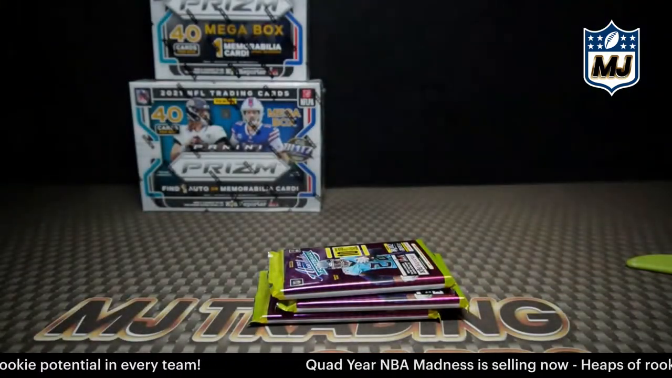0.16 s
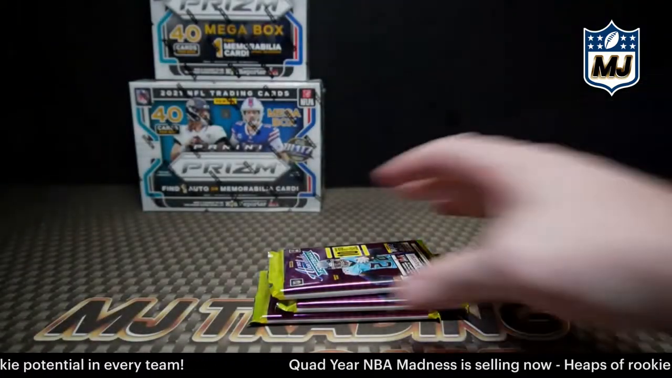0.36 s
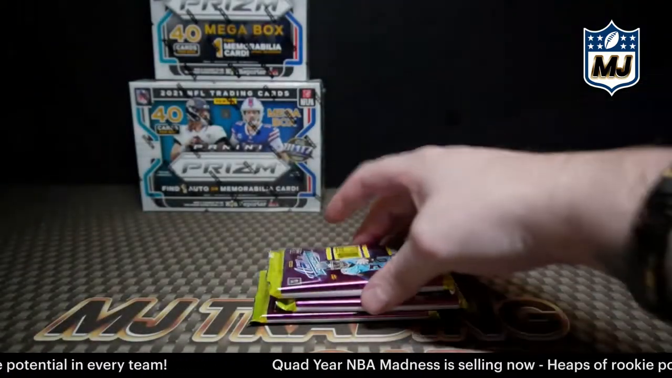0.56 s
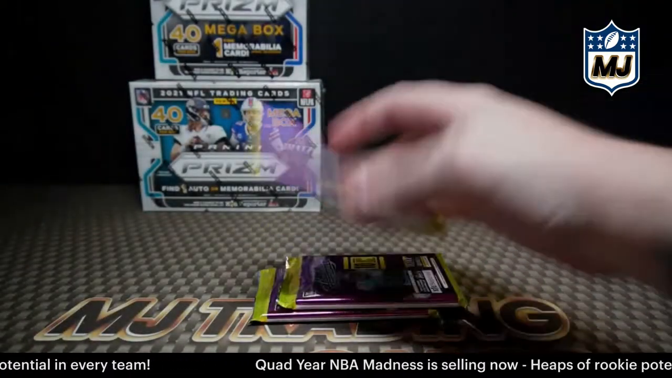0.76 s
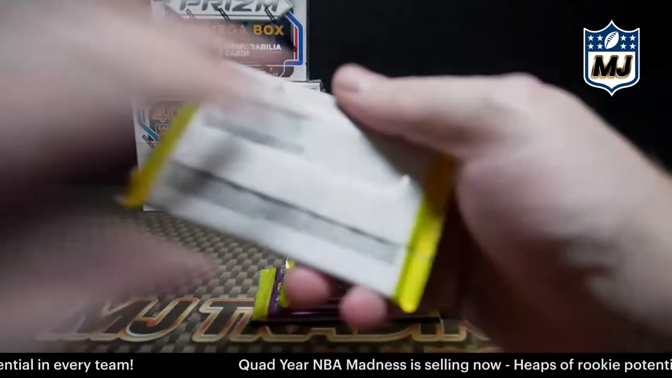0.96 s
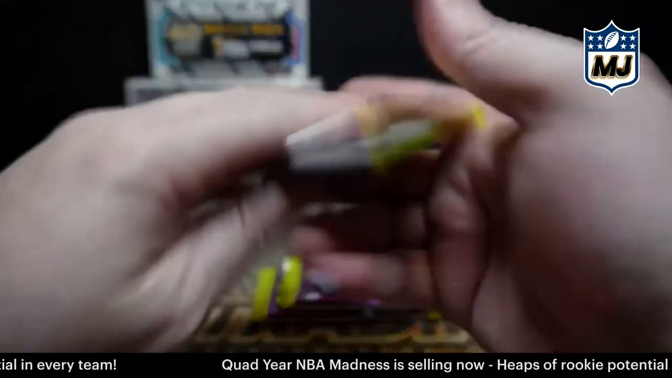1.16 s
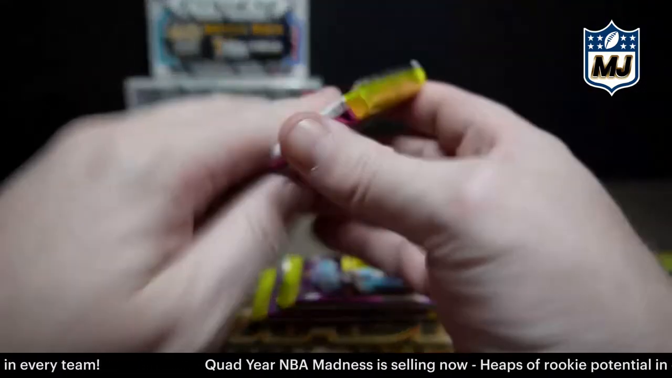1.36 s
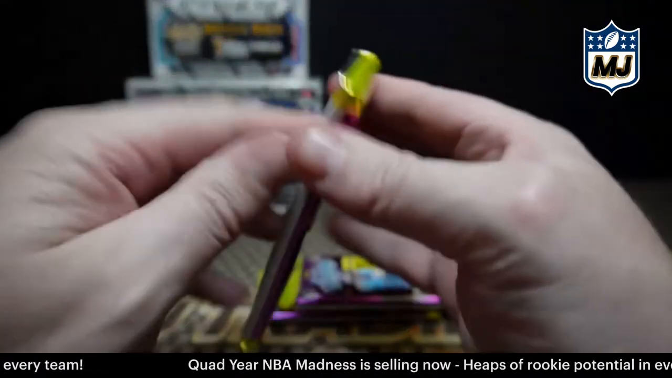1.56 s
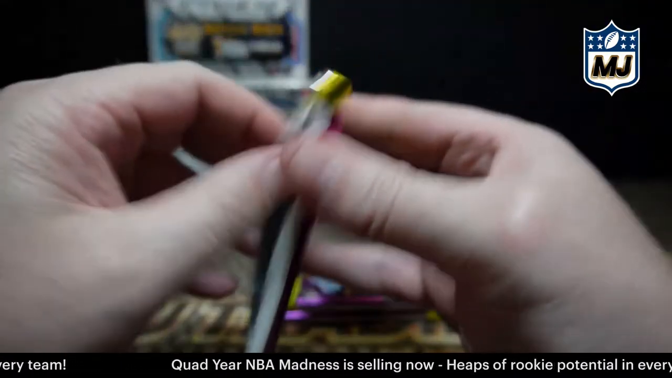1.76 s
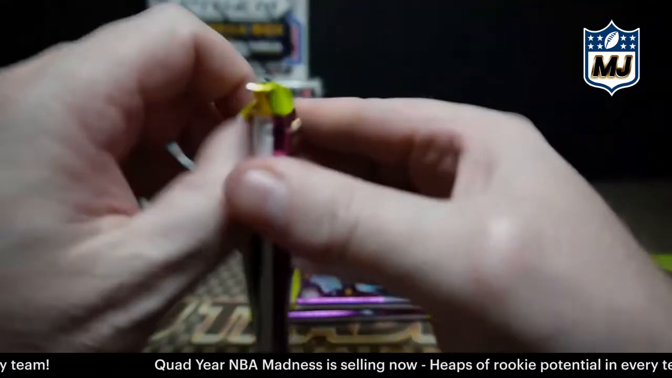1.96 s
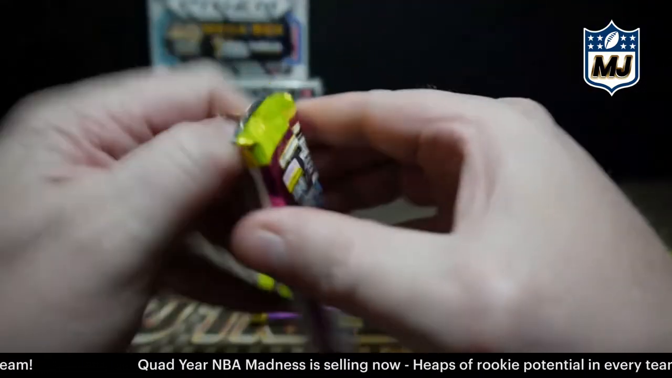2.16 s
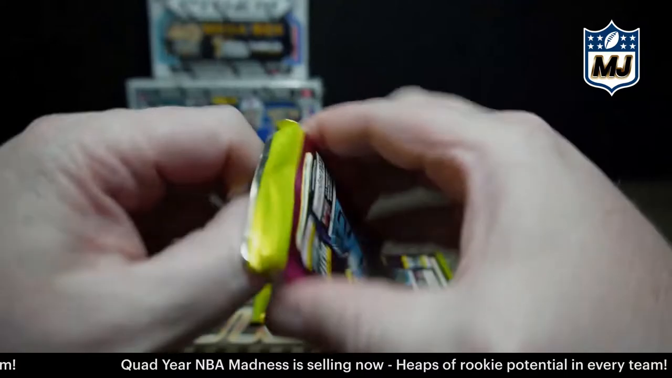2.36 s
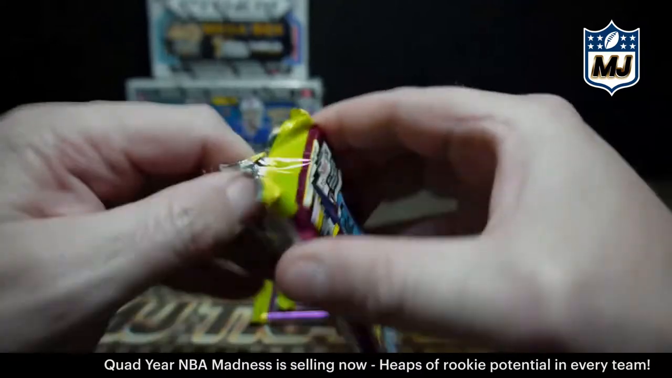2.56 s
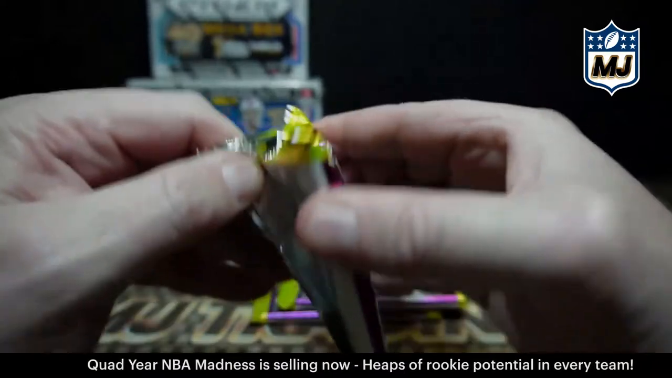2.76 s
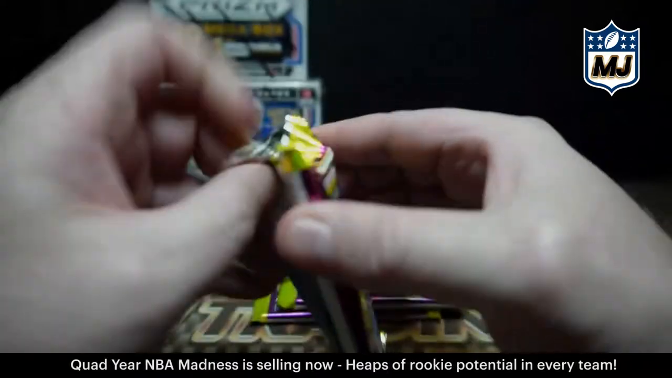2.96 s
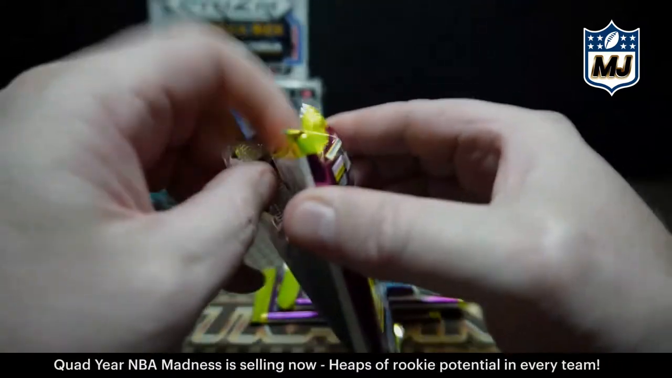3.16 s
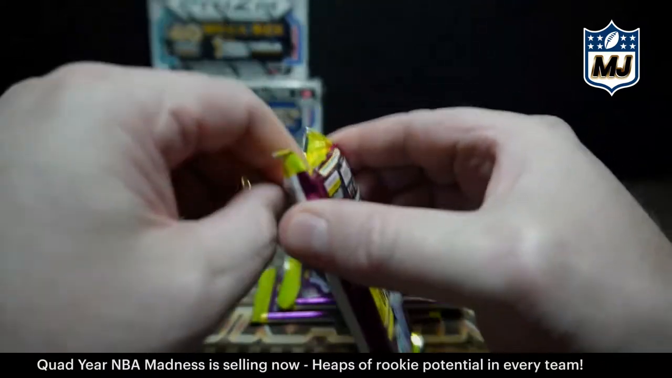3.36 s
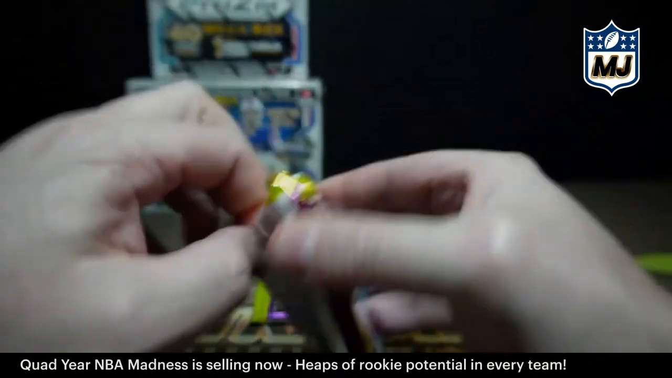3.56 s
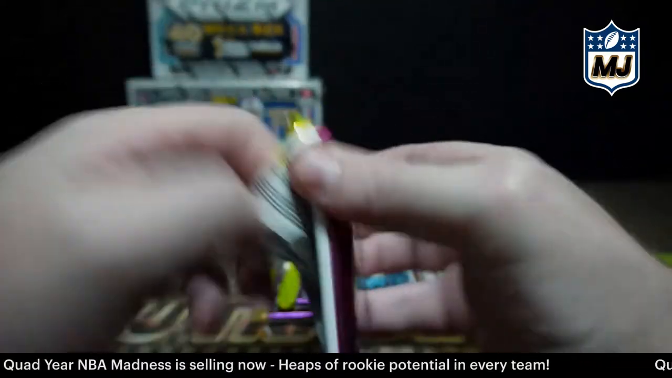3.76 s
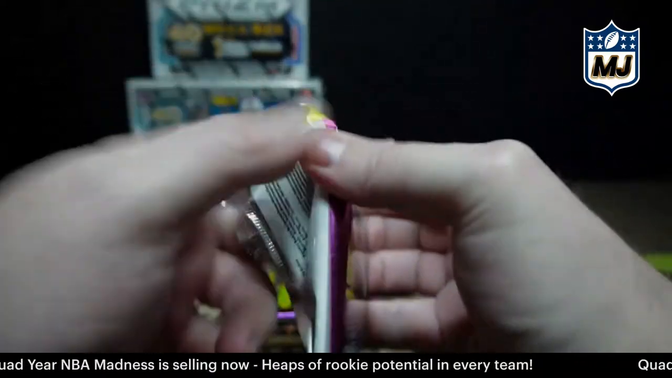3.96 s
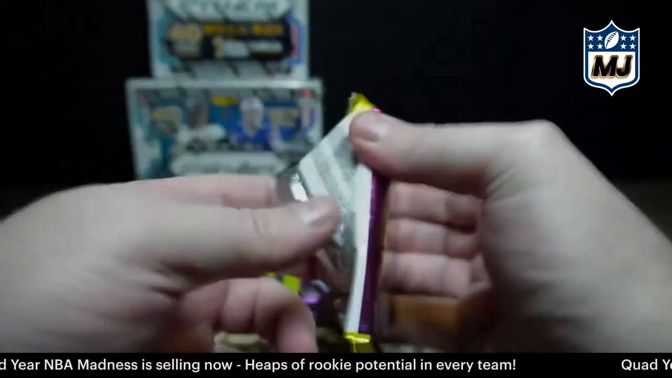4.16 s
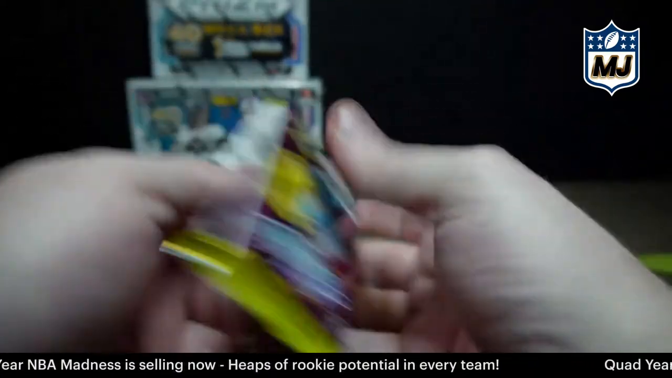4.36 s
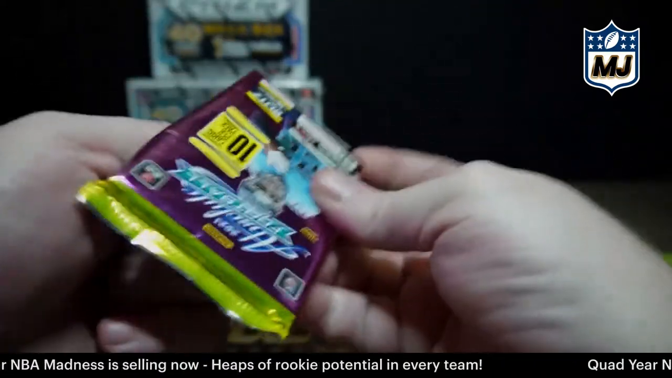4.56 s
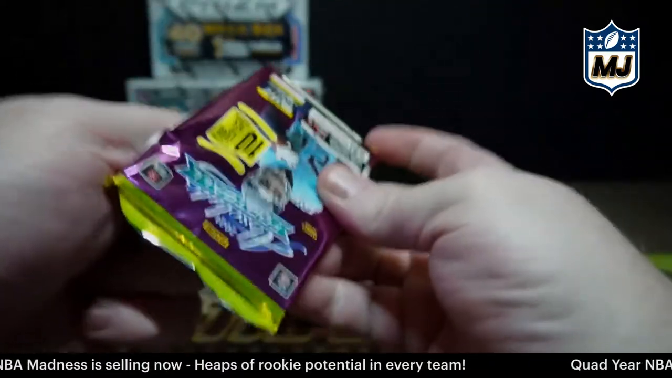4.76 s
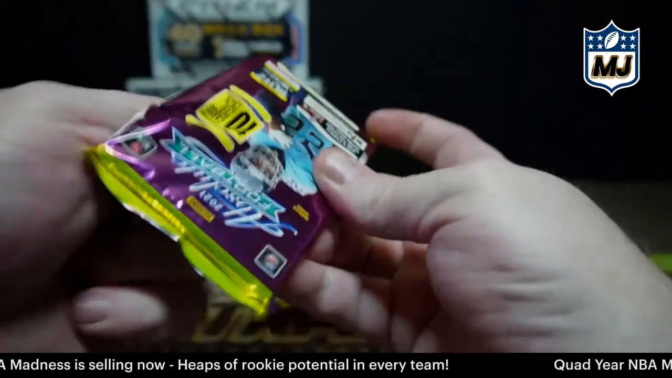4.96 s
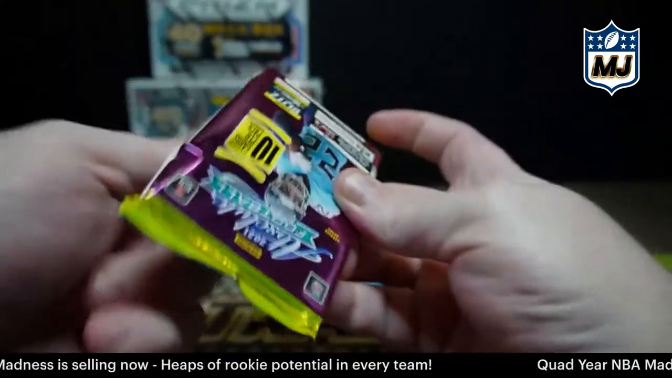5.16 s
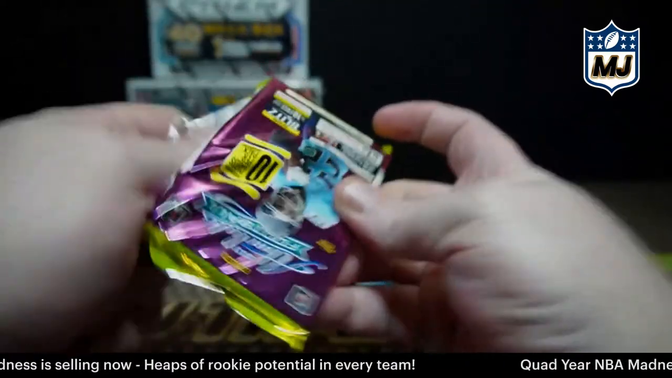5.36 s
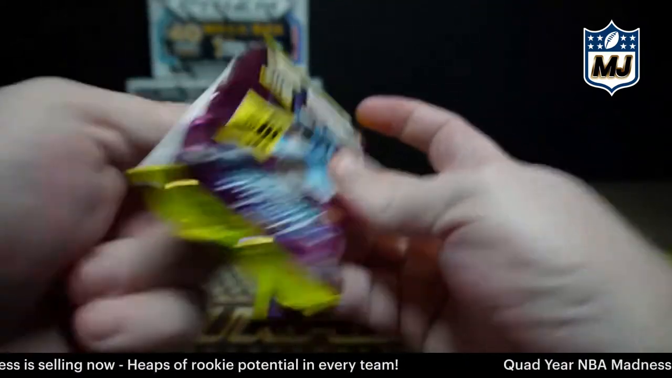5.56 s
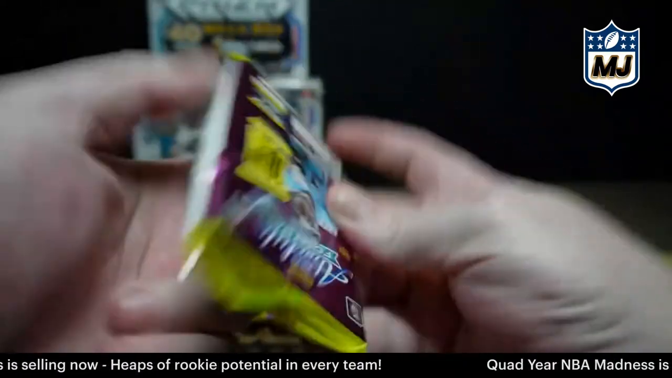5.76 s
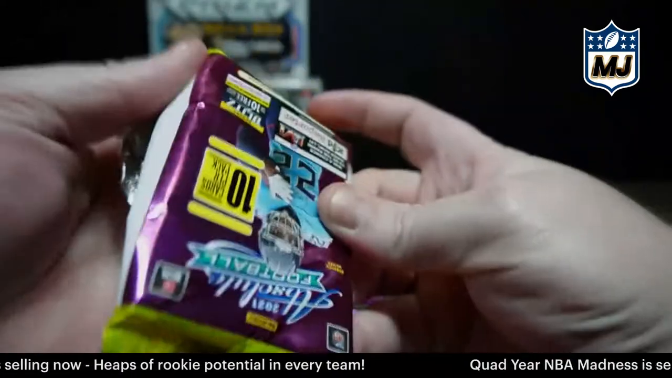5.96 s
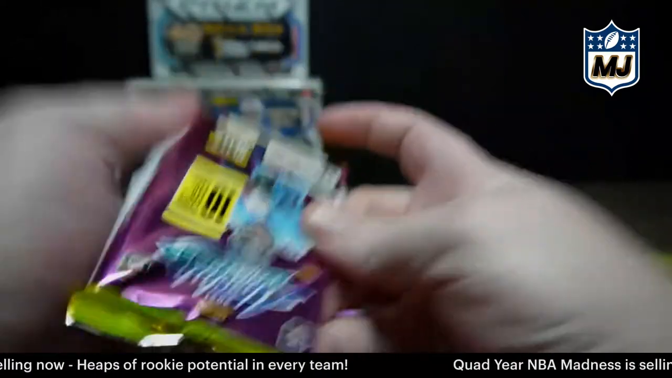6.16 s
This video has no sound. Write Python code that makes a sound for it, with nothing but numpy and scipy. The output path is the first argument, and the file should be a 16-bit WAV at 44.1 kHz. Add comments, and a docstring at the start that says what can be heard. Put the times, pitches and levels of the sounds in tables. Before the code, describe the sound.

Hands tear open a foil card pack close up, the thin wrapper crackling and snapping almost continuously in a quiet room.

```python
"""A quiet room, close up: two hands pick up a foil packet, pull its seam apart and crumple it.
Creases buckle as sharp snaps over a bed of fine crackle; large folds pop hollow; the seal peels in
fast slips. The grip shapes the foil's lows, ring and treble. Underneath: soft handling thuds and
scuffs, low table or room resonance, a faint hum and room tone.
A noise suppressor lowers the quiet moments; a limiter holds the peaks."""
import sys
import numpy as np
from scipy import signal
from scipy.io import wavfile
from scipy.ndimage import uniform_filter1d, minimum_filter1d

SR = 44100
rng = np.random.default_rng(int(sys.argv[2]) if len(sys.argv) > 2 else 0)


def to_wav(sig):
    """Store sig (one row per channel, or 1-D mono) as 16-bit WAV at the path in sys.argv[1].

    Samples outside -1..1 are clipped; the rate is SR.
    """
    pcm = np.clip(np.atleast_2d(sig), -1, 1) * 32767
    pcm = np.round(pcm).astype(np.int16)
    wavfile.write(sys.argv[1], SR, pcm.T)  # frames by channels


N = 277422

# loudest buckling creases: start_s, level_db
CREASE_SNAPS = [(0.7984, -20.9), (0.8163, -20.2), (0.8612, -25.4), (1.1325, -19.7), (1.1999, -17.1),
                (1.2869, -9.7), (1.3296, -14.0), (1.3357, -8.8), (1.3837, -17.3), (1.4237, -11.0),
                (1.4824, -18.1), (1.6925, -18.4), (1.7093, -10.8), (1.8949, -26.0), (1.9319, -19.2),
                (1.9981, -10.4), (2.0047, -10.7), (2.1351, -9.3), (2.2573, -9.9), (2.2674, -9.4),
                (2.3114, -10.5), (2.3371, -12.0), (2.3938, -10.0), (2.4364, -9.1), (2.4466, -8.9),
                (2.4853, -9.3), (2.5251, -11.6), (2.5766, -7.6), (2.6166, -10.6), (2.6606, -14.9),
                (2.6661, -9.6), (2.6825, -11.2), (2.7079, -10.9), (2.7536, -10.5), (2.7693, -8.4),
                (2.8236, -8.2), (2.8508, -10.9), (2.9243, -7.6), (3.001, -12.5), (3.0122, -12.7),
                (3.037, -12.2), (3.1739, -12.1), (3.196, -8.4), (3.2513, -13.1), (3.3082, -13.3),
                (3.3289, -9.0), (3.4265, -9.7), (3.4315, -11.3), (3.4471, -12.1), (3.4621, -15.0),
                (3.5231, -14.6), (3.5376, -15.2), (3.5737, -16.2), (3.6088, -12.9), (3.6173, -7.2),
                (3.6439, -6.8), (3.7174, -12.6), (3.729, -10.5), (3.735, -13.0), (3.7562, -11.7),
                (3.7714, -8.2), (3.7917, -7.2), (3.9127, -6.8), (4.0017, -8.1), (4.0843, -12.3),
                (4.1276, -6.6), (4.1528, -9.1), (4.1589, -9.6), (4.2407, -8.6), (4.2737, -6.7),
                (4.3481, -8.9), (4.39, -7.8), (4.4019, -7.2), (4.455, -12.1), (4.4653, -7.7), (4.481, -8.3),
                (4.4973, -8.2), (4.5075, -8.6), (4.5547, -8.2), (4.6104, -18.3), (4.6177, -15.7),
                (4.6302, -12.1), (4.6469, -12.8), (4.6566, -6.8), (4.6836, -8.2), (4.7051, -5.6),
                (4.7482, -7.5), (4.7564, -7.4), (4.7705, -6.4), (4.7881, -9.2), (4.8432, -9.3),
                (4.8564, -6.8), (4.8683, -10.2), (4.8799, -7.8), (4.9367, -18.7), (4.9685, -7.5),
                (4.986, -7.6), (4.9988, -8.4), (5.0465, -11.7), (5.1072, -11.4), (5.2017, -12.8),
                (5.2505, -9.8), (5.2755, -5.4), (5.3246, -5.6), (5.3373, -10.0), (5.3813, -13.1),
                (5.429, -10.7), (5.4795, -7.7), (5.5546, -7.9), (5.6075, -9.8), (5.6487, -10.8),
                (5.7139, -10.1), (5.7235, -11.7), (5.7667, -7.7), (5.8173, -8.3), (5.8406, -7.4),
                (5.8461, -10.3), (5.8628, -8.5), (5.9103, -9.7), (5.9411, -10.8), (6.0698, -13.3),
                (6.1182, -8.0), (6.2565, -8.8)]
# thin foil spectrum: freq_hz, density_db
FOIL_SPECTRUM = [(240, -43.5), (400, -22), (563, -22.5), (986, -14.5), (1460, -11), (3030, -3), (6000, 2),
                 (7820, -4.5), (14600, -4), (15700, -11.5)]
# large folds: start_s, level_db, pitch_hz
FOLD_POPS = [(2.769, -29.5, 1060), (2.923, -21, 1320), (3.437, -32, 1140), (4.39, -15.5, 1070),
             (5.274, -19.5, 1070), (5.478, -20, 1080), (5.554, -16.5, 1040), (5.589, -20, 1180)]
# glued seal letting go: time_s, level_db, slips_per_s
SEAL_PEEL = [(2.147, -31.5, 445), (2.169, -24, 420), (2.191, -39.5, 440), (2.202, -27.5, 940),
             (2.244, -43, 1300)]
# hold on the packet: time_s, slack_db, ring_hz, treble_db
GRIP_CURVE = [(.6, 5, 2340, -11), (.9, 10.5, 3000, -43), (1.1, -25, 4640, 3.5), (1.38, 7, 2760, -22),
              (1.62, -5.5, 3580, -1), (2.05, 0, 3980, -1.5), (2.2, -4, 3330, -6.5), (2.4, 6.5, 3600, 3),
              (2.9, 6.5, 3090, -1), (3.4, 10, 3950, -6), (3.66, -1, 4330, 0.5), (3.9, 3, 3340, -3),
              (4.801, 0, 2280, -6), (5.18, -15, 2530, -18), (5.27, -4, 2740, -10), (5.5, 2.5, 2890, -0.2),
              (6.1, -1, 2310, -6.3), (6.29, 7, 2850, -14)]
# finger squeezes and pulls: full_force_s, hold_s, level_db
FINGER_SQUEEZES = [(0.507, 0.032, -81.5), (0.583, 0.014, -69), (0.813, 0.021, -54), (1.05, 0.027, -69),
                   (1.178, .01, -45), (1.265, 0.22, -46), (1.694, 0.033, -40), (2.041, 0.014, -30),
                   (2.157, 0.11, -38.5), (2.375, 0.12, -36), (2.695, 0.13, -38.5), (2.88, 0.056, -35.5),
                   (2.996, 0.057, -48.5), (3.188, 0.0077, -33), (3.322, 0.012, -40.5), (3.427, 0.011, -34),
                   (3.62, 0.038, -47.5), (3.79, 0.076, -34), (3.84, 0.038, -25.5), (3.928, 0.12, -34),
                   (4.134, 0.074, -38), (4.27, 0.014, -35.5), (4.361, 0.04, -33), (4.443, 0.15, -37.5),
                   (4.646, 0.13, -35.5), (4.767, 0.14, -35), (4.992, 0.085, -32), (5.118, 0.0052, -30.5),
                   (5.229, 0.12, -33), (5.294, 0.026, -30.5), (5.368, 0.15, -38), (5.575, 0.079, -34),
                   (5.764, 0.049, -33), (5.852, 0.026, -34), (5.94, 0.076, -28.5), (6.138, 0.048, -28),
                   (6.257, 0.044, -30.5)]
# crackle floor of the held foil: time_s, level_db
CRACKLE_FLOOR = [(.98, -81), (1.07, -63.5), (2.0, -59), (2.3, -42), (3.0, -48), (3.1, -58.5), (3.4, -55),
                 (3.55, -46.5), (6.29, -50.5)]
# thuds, scuffs, table or room resonance, faint hum: start_s, length_s, level_db, centre_hz, width_hz
LOW_THUDS_AND_RESONANCES = [(0.135, 0.084, -74.5, 2350, 600), (0.491, 0.077, -67, 279, 130),
                            (0.498, .055, -73, 1195, 90), (0.564, 0.11, -65, 150, 130),
                            (1.339, 0.056, -53, 171, 300), (1.394, 0.12, -62, 280, 130),
                            (1.71, 0.35, -68, 757, 110), (2.394, 0.3, -62.5, 353, 90),
                            (3.16, 0.12, -59, 305, 90), (3.299, 0.075, -57.5, 362, 70),
                            (3.837, 0.1, -50, 308, 197), (4.13, 0.2, -55.5, 322, 80),
                            (4.343, 0.12, -56, 293, 80), (4.626, 0.16, -58, 332, 75),
                            (5.47, 0.22, -62.5, 305, 60), (5.979, 0.072, -57.5, 216, 200)]
# room tone spectrum: freq_hz, density_db
ROOM_TONE_SPECTRUM = [(18, -94), (30, -49), (131, -15.5), (239, -18.5), (384, -18.5), (600, -36),
                      (988, -27), (16000, -58)]


def gain_of(db):
    return 10 ** (np.asarray(db) / 20)


def unit_rms(x):
    return x / np.sqrt(np.mean(x ** 2) + 1e-20)


def add(mix, start_s, sound):
    part = mix[round(start_s * SR):][:len(sound)]
    part += sound[:len(part)]


def butter(x, order, cutoff_hz, kind):
    return signal.sosfilt(signal.butter(order, cutoff_hz, kind, fs=SR, output="sos"), x)


def colour(x, spectrum):
    """Minimum-phase filter of unit energy from a spectrum table."""
    freq_hz, density_db = np.transpose(spectrum)
    bin_hz = abs(np.fft.fftfreq(4096, 1 / SR))
    log_gain = np.interp(np.log(bin_hz + 1), np.log(freq_hz + 1), density_db) * np.log(10) / 20
    taps = np.fft.ifft(np.exp(log_gain - 1j * signal.hilbert(log_gain).imag)).real[:2048]
    return signal.oaconvolve(x, taps / np.linalg.norm(taps))[:len(x)]


def resonate(x, centre_hz, width_hz):
    """Resonance at a steady or moving pitch; white noise keeps its level."""
    carrier = np.exp(2j * np.pi * np.cumsum(centre_hz * np.ones(len(x))) / SR)
    pole = np.exp(-np.pi * width_hz / SR)
    return np.sqrt(2 * (1 - pole * pole)) * (carrier * signal.lfilter([1], [1, -pole], x / carrier)).real


def crease_snaps(force_db, buckle_s=0.001, rise_s=0.000069, ring_db=-3, spread_oct=2.19, small_count=80):
    """Each crease buckles in a burst that rings a facet; small snaps at random times scale with force."""
    out, t = np.zeros(N), np.arange(1200) / SR
    envelope = (1 - np.exp(-t / rise_s)) * np.exp(-t / buckle_s)
    small_snaps = [(position * N / SR, force_db[int(position * N)] + 9 + 6 * strength)
                   for position, strength in rng.random((small_count, 2))]
    grip_s, _, ring_hz, _ = np.transpose(GRIP_CURVE)
    for start_s, level_db in small_snaps + list(CREASE_SNAPS):
        burst = envelope * rng.standard_normal(len(t))
        facet_hz = np.interp(start_s, grip_s, ring_hz) * 2 ** (spread_oct * (rng.random() - .5))
        ring = gain_of(ring_db) * resonate(burst, facet_hz, width_hz=1100)
        snap = colour(burst + ring, FOIL_SPECTRUM)
        snap *= np.linalg.norm(envelope) / np.linalg.norm(snap)
        add(out, start_s, gain_of(level_db) / 2 * snap)  # crest factor about 2
    return out


def fine_crackle(force_db, ticks_per_s=1000, spread_db=3.5, hiss_db=-2, clump_db=3.5, clump_s=0.0089):
    """Tiny creases of unequal size tick on 24 facet pitches, over hiss; the level comes in clumps."""
    clumps = unit_rms(uniform_filter1d(rng.standard_normal(N), int(clump_s * SR)))
    sizes = gain_of(spread_db * np.minimum(rng.exponential(1, N), 4))
    impulses = sizes * (rng.random(N) < ticks_per_s / SR)
    facet, ticks = rng.integers(0, 24, N), np.zeros(N)
    for k, facet_hz in enumerate(np.geomspace(700, 9000, 24)):
        tick = rng.standard_normal(400) * np.exp(-np.arange(400) / 7.0)
        tick += 0.6 * resonate(tick, facet_hz, facet_hz / 8)  # large facets ring lower and longer
        ticks += signal.oaconvolve(impulses * (facet == k), tick / np.linalg.norm(tick))[:N]
    levelled = ticks / np.sqrt(uniform_filter1d(ticks ** 2, 3000) + 1e-9)
    hiss = gain_of(hiss_db) * rng.standard_normal(N)
    return (levelled + hiss) * gain_of(force_db + clump_db * clumps)


def fold_pops(t60_s=0.011, rise_s=0.00035):
    """The air pocket of a large fold rings briefly."""
    out, t = np.zeros(N), np.arange(2000) / SR
    for start_s, level_db, pitch_hz in FOLD_POPS:
        envelope = gain_of(level_db - 60 * t / t60_s) * (1 - np.exp(-t / rise_s))
        add(out, start_s, envelope * np.sin(2 * np.pi * pitch_hz * t))
    return out


def seal_peel(jitter=0.58, ring_hz=3350, width_hz=500, upper_db=-6):
    """Uneven slips of the seal ring two modes of the taut strip."""
    time_s, *columns = np.transpose(SEAL_PEEL)
    t = np.arange(time_s[0], time_s[-1], 1 / SR)
    level_db, slips_per_s = (np.interp(t, time_s, column) for column in columns)
    wobble = unit_rms(uniform_filter1d(rng.standard_normal(len(t)), 100))
    slip_phase = np.cumsum(slips_per_s * (1 + jitter * wobble)) / SR % 1
    slips = np.exp(-slip_phase / 0.89) * rng.standard_normal(len(t))
    lower = resonate(slips, ring_hz, width_hz)
    upper = gain_of(upper_db) * resonate(slips, 2.5 * ring_hz, 3 * width_hz)
    out = np.zeros(N)
    add(out, time_s[0], gain_of(level_db) * unit_rms(lower + upper + 3.1 * slips))
    return out


def finger_force_db(rise_db_per_s=714, release_db_per_s=304):
    """Force as crackle level: each squeeze rises, holds and lets go, over the floor of the held foil."""
    t = np.arange(N) / SR
    power = gain_of(2 * np.interp(t, *np.transpose(CRACKLE_FLOOR), left=-120))
    for full_force_s, hold_s, level_db in FINGER_SQUEEZES:
        rise_db = rise_db_per_s * np.maximum(full_force_s - t, 0)
        release_db = release_db_per_s * np.maximum(t - full_force_s - hold_s, 0)
        power += gain_of(2 * (level_db - rise_db - release_db))
    return 10 * np.log10(power)


def grip_filter(foil, force_db, split_hz=1700, ring_db=-10, lows_db_per_db=0.12, firm_db=-35):
    """Slack and force raise the lows; the stretched part rings; the hands shade the treble."""
    time_s, *columns = np.transpose(GRIP_CURVE)
    slack_db, ring_hz, treble_db = (np.interp(np.arange(N) / SR, time_s, column) for column in columns)
    foil = butter(foil, 2, 300, "high")  # a small sheet radiates no bass
    lows, highs = (butter(foil, 4, split_hz, kind) for kind in ("low", "high"))
    lows *= gain_of(slack_db + lows_db_per_db * (force_db - firm_db))
    mids = butter(highs, 1, 7000, "low")
    treble = gain_of(treble_db) * (highs - mids)
    ring = gain_of(ring_db) * resonate(highs, ring_hz, width_hz=800)
    return lows + mids + treble + ring


def low_thuds_and_resonances():
    """Swelling noise bands: handling thuds and scuffs, low table or room resonance, a faint hum."""
    out = np.zeros(N)
    for start_s, length_s, level_db, centre_hz, width_hz in LOW_THUDS_AND_RESONANCES:
        noise = rng.standard_normal(16000)[:int(length_s * SR)]
        band = resonate(resonate(noise, centre_hz, width_hz), centre_hz, width_hz)
        add(out, start_s, gain_of(level_db) * unit_rms(band) * signal.windows.tukey(len(band), .6))
    return out


def room_reflections(x, level_db=-10, t60_s=0.096, gap_s=0.002):
    """Sparse decaying echoes of random sign; soft surfaces absorb the treble."""
    delays = np.arange(0, 15980, 20) + rng.integers(0, 20, 799)
    decay = gain_of(-60 * delays / SR / t60_s) * (delays > gap_s * SR)
    taps = np.zeros(16000)
    taps[delays] = rng.choice([-1., 1.], len(delays)) * decay
    dull = butter(x, 1, 6000, "low")
    return gain_of(level_db) * signal.oaconvolve(dull, taps / np.linalg.norm(taps))[:N]


def room_tone(level_db=-74.5):
    """Faint, steady low noise."""
    return gain_of(level_db) * colour(rng.standard_normal(N), ROOM_TONE_SPECTRUM)


def scene():
    force_db = finger_force_db()
    snaps = crease_snaps(force_db)
    crackle_and_peel = colour(fine_crackle(force_db) + seal_peel(), FOIL_SPECTRUM)
    packet = grip_filter(snaps + crackle_and_peel + fold_pops(), force_db)
    background = room_tone()
    return (packet + room_reflections(packet) + low_thuds_and_resonances() + background)[None]


def record(dry, threshold_db=-66.5, depth_db=8.5, fall_db_per_s=60, ceiling=0.4, band_hz=(70, 16000)):
    """Noise suppressor, fast peak limiter, band limits."""
    power_db = 10 * np.log10(abs(uniform_filter1d(dry[0] ** 2, 900)) + 1e-12)
    fall_db = np.arange(N) * fall_db_per_s / SR
    detector_db = np.maximum.accumulate(power_db + fall_db) - fall_db  # decaying peak hold
    gated = dry * gain_of(np.clip(0.4 * (detector_db - threshold_db), -depth_db, 0))
    limit_gain = np.minimum(ceiling / (abs(gated) + 1e-9), 1)
    limited = gated * uniform_filter1d(minimum_filter1d(limit_gain, size=121), size=61)
    lowpass = signal.firwin(511, band_hz[1], window=("kaiser", 9), fs=SR)
    return signal.oaconvolve(butter(limited, 2, band_hz[0], "high"), lowpass[None], "same")


dry = scene()
out = record(dry)
to_wav(out)
```